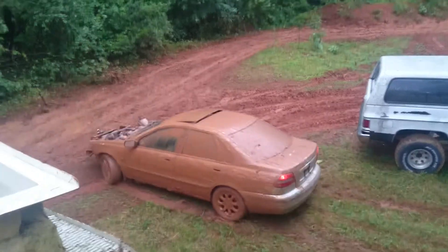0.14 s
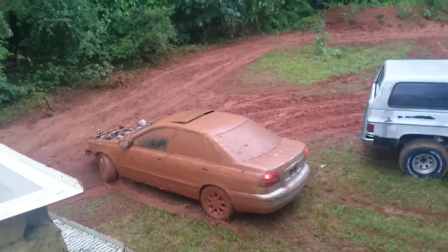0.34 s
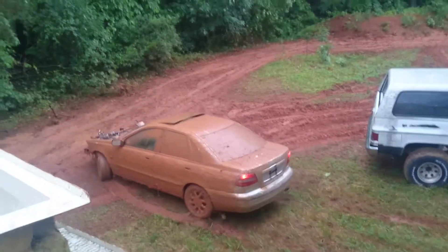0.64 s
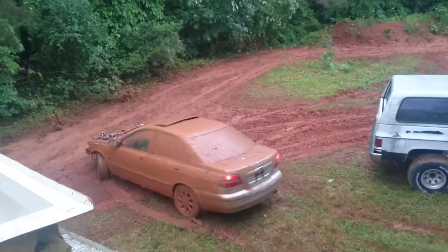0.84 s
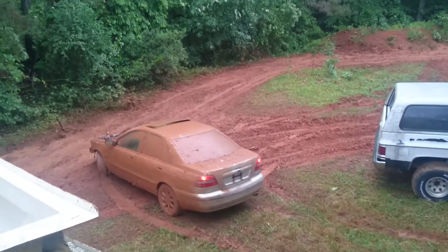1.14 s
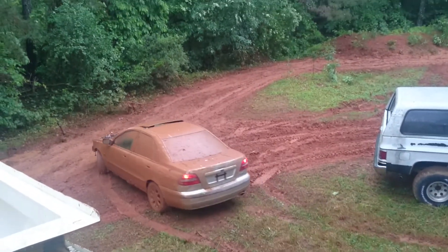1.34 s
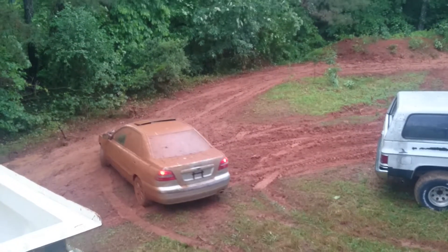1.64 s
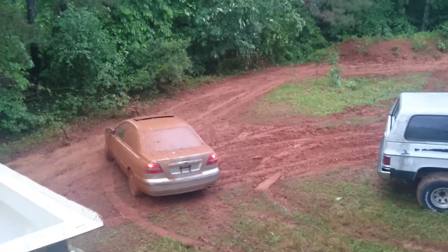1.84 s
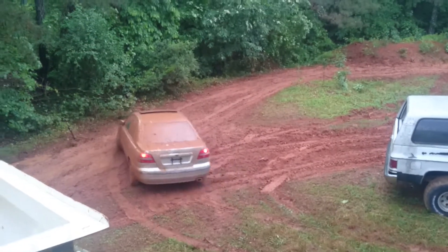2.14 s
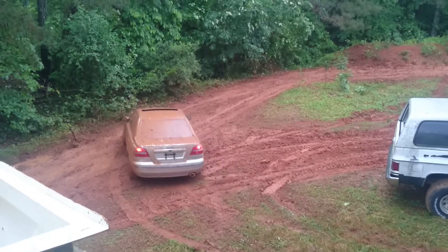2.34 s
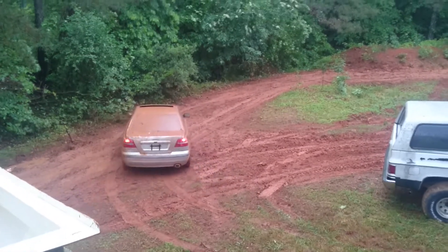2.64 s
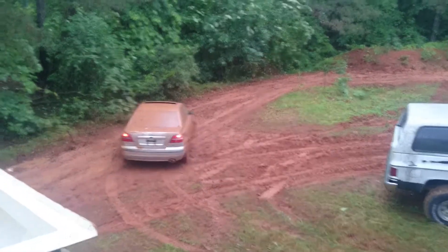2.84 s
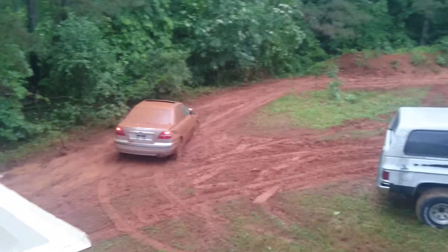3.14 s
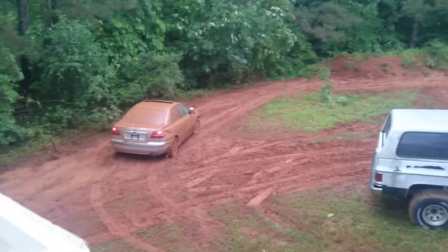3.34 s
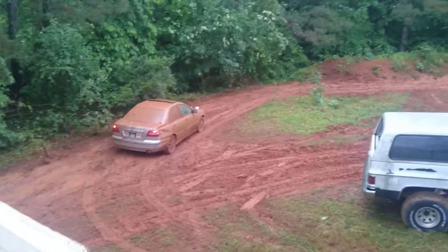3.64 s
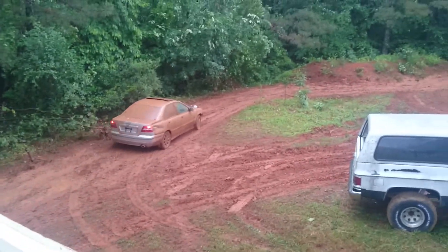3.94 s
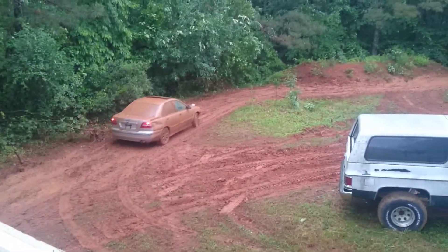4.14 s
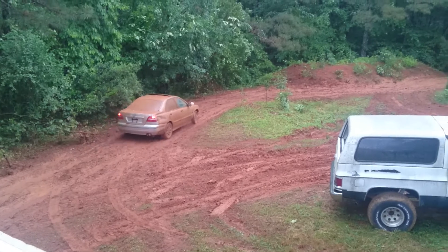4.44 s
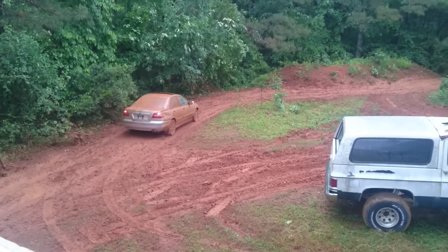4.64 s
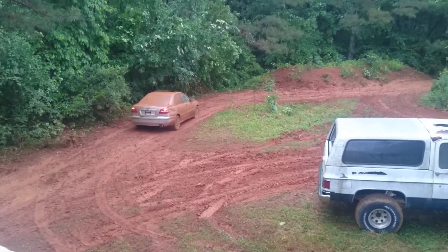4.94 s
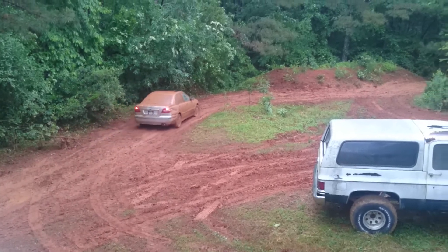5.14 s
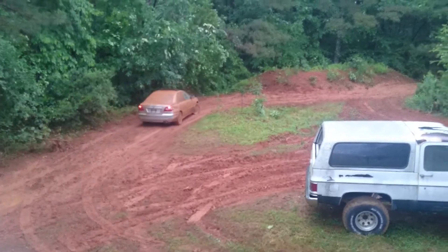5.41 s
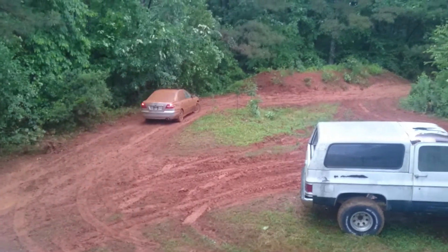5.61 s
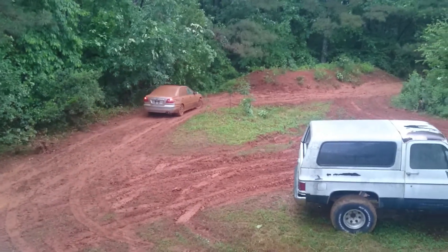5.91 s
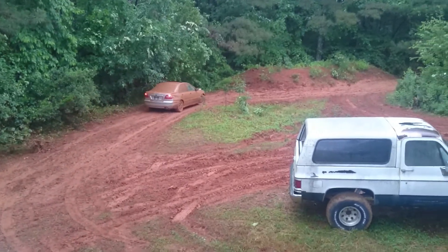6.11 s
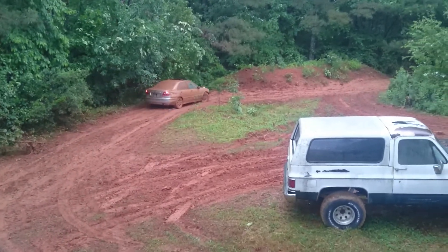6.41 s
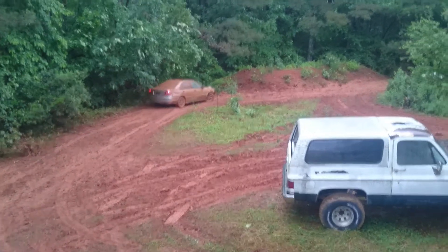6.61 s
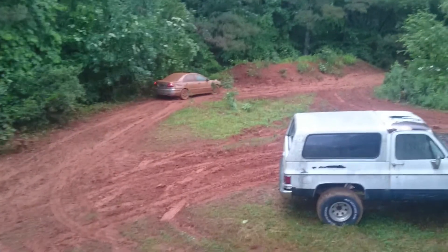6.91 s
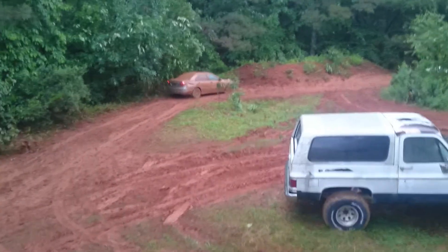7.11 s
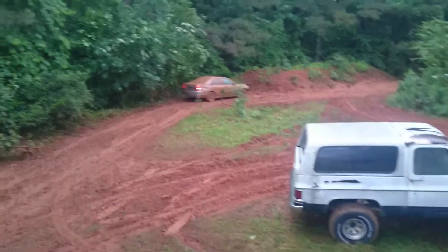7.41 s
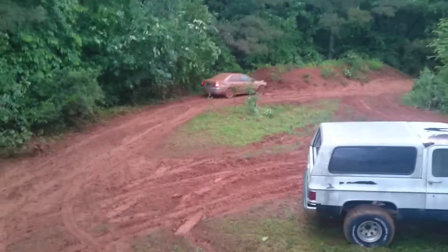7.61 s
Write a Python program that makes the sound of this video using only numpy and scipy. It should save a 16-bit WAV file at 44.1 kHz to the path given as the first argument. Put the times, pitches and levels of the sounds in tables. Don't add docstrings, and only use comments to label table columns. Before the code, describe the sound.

Spinning tyres sling wet mud in a loud rushing hiss over a low steady engine drone as a car pulls away and fades.

```python
import sys
import numpy as np
from scipy import signal
from scipy.fft import rfft, irfft, next_fast_len
from scipy.io import wavfile
from scipy.ndimage import uniform_filter1d, map_coordinates

SR = 44100
rng = np.random.default_rng(int(sys.argv[2]) if len(sys.argv) > 2 else 0)


def invert_db(level):
    return 10 ** (np.asarray(level, dtype=float) / 20)


def unload_wav(signal):
    wavfile.write(
        sys.argv[1],
        SR,
        np.round(np.clip(np.atleast_2d(signal).T, -1, 1) * 32767).astype(np.int16),
    )


N = 342417
TIME = np.arange(N) / SR
SIZE = next_fast_len(N + 8192)
HZ = np.fft.rfftfreq(SIZE, 1 / SR)

# (frequency [Hz], lead [radians])
LEAD_FROM_BEHIND = [(1290, 3.51), (2930, 4.33), (3960, 4.34), (4220, 3.46), (4910, 4.7), (6120, 5.53),
                    (6890, 9.5), (8610, 12), (10200, 10.8), (11700, 11.06), (14000, 13.5), (15500, 18),
                    (16500, 15)]


def unit(x):
    return x / np.sqrt(np.mean(x ** 2) + 1e-20)


def curves(rows):
    times, *columns = np.transpose(rows)
    return np.array([np.interp(TIME, times, column) for column in columns])


def along(rows):
    freqs, *columns = np.transpose(rows)
    return np.array([np.interp(np.log(HZ + 1), np.log(freqs + 1), column) for column in columns])


def wobble(rate):
    coarse = TIME[::128]
    knots = rng.standard_normal(int(N * rate / SR) + 4)
    return np.interp(TIME, coarse, map_coordinates(knots, [coarse * rate]))


def plateau(start, end, db_per_s):
    return -db_per_s * np.maximum(np.maximum(start - TIME, TIME - end), 0)


def ports(lead):
    # (frequency [Hz], lead [radians])
    bass_lead = [(60, 2.98), (150, 2.99), (260, 3.08), (500, 3.13), (780, 3.3)]
    freqs, radians = np.transpose(bass_lead + lead)
    left = -np.exp(1j * np.interp(HZ, freqs, radians))
    right = -np.ones(len(HZ))
    return np.array([left, right])


def engine():
    # (time [s], firing rate [Hz], load level [dB], throttle level [dB])
    driving = [(0, 64.5, -34, -2), (.3, 74, -30, 0), (.6, 81.8, -29, 10), (.86, 86.8, -37, 13),
               (1.11, 84.6, -41, 5), (1.27, 71.4, -33.5, -1), (1.6, 71.8, -37.5, -1),
               (1.95, 76.4, -39.5, -3), (2.75, 65.5, -39, -7), (3.65, 71.8, -35, 3), (4.25, 75, -36, 2),
               (4.55, 80, -40, 4), (5.03, 88.6, -33, 5), (5.47, 86.6, -32.5, 4), (6.05, 72, -44, -6),
               (6.6, 64.8, -43, -4), (7.0, 66.5, -48, -2), (7.2, 56, -57, -14)]
    # (frequency [Hz], level [dB])
    pipe = [(115, -5), (134, -2), (146, 0), (158, 0), (165, -3), (171, -8), (177, -10)]
    # (multiple of the firing rate [-], level at middle revs [dB])
    weak_orders = [(.5, -72), (1.5, -67), (3, -61), (4.5, -67), (5, -70), (6, -65), (7.5, -70), (9, -56),
                   (10.5, -70)]
    second_start_db, leaving_db_per_s = -38, 1.6

    rate, first_db, effort_db = curves(driving)
    rate = uniform_filter1d(rate, SR // 8)
    second_db = second_start_db - leaving_db_per_s * TIME + np.interp(2 * rate, *np.transpose(pipe))
    phase = 2 * np.pi * np.cumsum(rate * (1 + 0.002 * wobble(20))) / SR
    first = invert_db(first_db + 0.8 * wobble(5) + wobble(11)) * np.cos(phase)
    second = invert_db(second_db + wobble(5) + wobble(11)) * np.cos(2 * phase - 0.6)
    weak = np.zeros(N)
    for multiple, db in weak_orders:
        weak += invert_db(effort_db + db + 2.8 * wobble(9)) * np.cos(multiple * phase + 0.9 * wobble(14))
    running = np.clip((7.3 - TIME) / 0.13, 0, 1)
    return np.sqrt(2) * (first + second + weak) * running


def fan():
    blade_hz = 258.6
    # (time [s], level [dB])
    fan_level = [(0, -41.5), (1.0, -41), (1.5, -51), (2.85, -54), (3.1, -62), (7.76, -63)]
    phase = 2 * np.pi * blade_hz * TIME + 0.25 * wobble(18)
    hum = np.sin(phase) + invert_db(-18) * np.sin(2 * phase)
    return np.sqrt(2) * invert_db(curves(fan_level)[0] + 1.5 * wobble(8)) * hum


def droplets(patchy_db, per_s, grain_db, spread_db):
    spectrum = signal.stft(rng.standard_normal((3, N)), nperseg=512)[2]
    patches = uniform_filter1d(rng.standard_normal(spectrum.shape[1:]), 6, 0)
    patches = uniform_filter1d(patches, 9, 1)
    noise = signal.istft(spectrum * invert_db(patchy_db * unit(patches)), nperseg=512)[1][:, :N]
    chance = rng.random((3, N))
    rarity = np.minimum(np.log(per_s / SR / chance), 3.5)
    drops = (chance < per_s / SR) * invert_db(grain_db + spread_db * rarity) * np.sign(noise)
    return noise + np.diff(drops, prepend=0)


def arriving(lead, echo_s, echo_db, direct_db):
    # (frequency [Hz], share [0-1])
    common_share = [(100, 0.96), (350, 0.99), (520, 0.92), (750, 0.99), (1200, 0.71), (2200, 0.51),
                    (3200, 0.44), (6000, 0.51), (7200, 0.24), (9000, 0.56), (15000, 0.57)]
    balance = invert_db(np.outer([0.5, -0.5, -0.5], direct_db))
    balance /= np.sqrt(np.mean(balance[:2] ** 2, axis=0))
    streams = balance * droplets(patchy_db=1.14, per_s=380, grain_db=-2.0, spread_db=6.5)
    common, *own = rfft(streams, SIZE)
    share = np.clip(along(common_share), 0, 1)
    echo = invert_db(echo_db) * np.exp(-2j * np.pi * HZ * echo_s) / (1 + (HZ / 9000) ** 2)
    direct = common * (1 + echo) / (1 - 0.01 * echo) * ports(lead)
    return np.sqrt(share) * direct + np.sqrt(1 - share) * np.array(own)


def clods():
    # (time [s], length [s], extra slush [dB], extra hiss [dB], extra mist [dB])
    splats = [(1.58, 0.082, -2, 0, 3.5), (1.663, 0.072, -5, -3, -7), (1.832, 0.026, 2, 1, 5),
              (2.069, 0.061, 9.5, 1.5, -5), (3.038, .02, 0, 1, 0), (3.238, 0.01, 5, 5, 2),
              (3.333, 0.0036, 13, 12, -4), (3.49, 0.039, 0.5, 6, 4), (3.536, 0.024, 0, 4, 5),
              (3.569, 0.024, -1, 4.5, 7), (3.616, 0.007, 5, -10, 9), (3.637, 0.037, 6, 5.5, 5),
              (3.685, 0.03, 9, 0, 4), (3.707, 0.018, 5, 7, 7), (3.742, 0.011, 10, 5, 22),
              (4.1, 0.015, -1, 4, -11), (5.23, 0.059, 0, 5.5, -3), (5.365, 0.048, 2, -0.5, 1),
              (5.639, 0.055, 5, 2, 3), (6.279, 0.093, 3.5, -0.5, 5), (6.48, 0.073, 8.5, 0.5, -4),
              (6.97, .01, -5, 4, 4), (2.676, 0.0043, 6, 8, 9), (3.288, .003, -8, -3, -1),
              (3.293, 0.0044, -16, -1, -4), (3.486, .006, 0, 5, 2), (4.466, 0.0054, -6, 9, 0),
              (4.527, .005, -2, 4, -4), (5.719, .005, 3, 10, 2), (5.833, .005, -9, 10, 2),
              (5.95, .005, -7, -6, 6), (2.85, 0.27, 0, -1.5, 2), (4.17, 0.17, 1.5, 0.5, -8),
              (4.62, .2, 0, -0.5, -2), (6.548, .22, 4, 0.5, -4), (7.12, 0.17, 1.5, 1, 1),
              (0.155, 0.24, 0.5, 1.5, -1), (0.46, 0.22, -1, 0, -1.5), (3.39, 0.092, 2.5, -1.5, 2),
              (1.442, 0.11, -4.5, -2, -1.5), (7.22, 0.17, 2.5, 1, -4)]
    extra = np.zeros((3, N))
    for s, length, *boost_db in splats:
        start = int(s * SR)
        u = np.arange(min(int(3 * length * SR), N - start)) / SR / length
        extra[:, start:start + len(u)] += np.outer(boost_db, np.minimum(8 * u, 1) * np.exp(-u ** 2))
    return extra


def mud_levels():
    # (time [s], wheelspin [dB], depth of the mud [dB], drag under the floor [dB])
    wheels = [(0, -37.5, -5.5, 2.5), (.25, -31, -6.5, 0), (.7, -28.5, -5.5, 0), (1.0, -30, -0.5, 0.5),
              (1.3, -29.5, -4, -5), (2.0, -32, -3.5, -4), (2.2, -41, -0.5, 8.5), (2.9, -35.5, -4, 2),
              (3.2, -27.5, -7, -2.5), (3.8, -29.5, -0.5, -0.5), (4.1, -31, -6, -2), (4.75, -32, -7, -3),
              (5.25, -27.5, -6.5, -7), (5.7, -30.5, -3, -2), (6.66, -40, -4, 5.5), (7.06, -35.5, 1, 4),
              (7.42, -47, 8, 15.5), (7.76, -50.5, 2.5, 10.5)]
    # (middle [s], half length [s], level [dB])
    arch = (2.09, 0.98, 4.1)
    full_spin_db = -30
    mist_base_db, mist_grows, mist_damped = -41, 1.3, 0.21
    sight_follows = 0.44
    slop_base_db, slop_feels_clods = -11.5, 0.23
    churn_base_db, churn_follows, churn_deep, churn_fade_db_per_s = -40.5, 1, 0.64, 1.25
    woods_db = -60

    surge = 0.3 * wobble(3.8) + 0.5 * wobble(20)
    thrown_db = clods()
    spin_db, depth_db, drag_db = curves(wheels)
    harder = spin_db - full_spin_db
    arch_db = arch[2] * np.exp(-((TIME - arch[0]) / arch[1]) ** 4)
    mist_db = mist_base_db + mist_grows * harder - mist_damped * depth_db + arch_db
    slop_db = slop_base_db + spin_db + drag_db + slop_feels_clods * thrown_db[0]
    direct_db = sight_follows * harder + 0.33 * thrown_db.max(axis=0)

    bands_db = np.array([slop_db, spin_db + depth_db, spin_db, mist_db])
    bands_db += 0.75 * np.pad(thrown_db, ((1, 0), (0, 0))) - 2.5
    bands_db += surge + 0.31 * np.array([wobble(9.2) for band in range(4)])
    churn_db = churn_base_db + churn_follows * harder + churn_deep * drag_db
    churn_db = churn_db - churn_fade_db_per_s * TIME + 1.3 * wobble(7)
    return invert_db(bands_db), invert_db(churn_db) + invert_db(woods_db), direct_db


def mud():
    # (frequency [Hz], ..)
    edges_hz = (560, 1000, 3000, 9000, 15850)
    # (start [s], end [s])
    turn_s = (1.94, 2.9)
    # (frequency [Hz], level per Hz [dB])
    churn_colour = [(20, -14), (45, -7), (70, -1), (120, -.5), (200, -0.5), (350, 2.5), (430, -3.5),
                    (600, -12.5), (900, -48)]
    # (frequency [Hz], left level [dB], right level [dB])
    flank_colour = [(490, -2, 4), (790, -1.2, 3), (1300, 5, 11), (2060, 9, 12.5), (2580, 2, 1.9),
                    (4200, -3, 2), (5500, -10, 10), (5470, 4.5, 10), (6250, 6.5, 6.5), (7240, 7.5, -3.5),
                    (8800, -5, -1.5), (10830, -3, -8), (14070, -10.5, -11), (15500, -4, -3)]
    # (frequency [Hz], left level [dB], right level [dB])
    behind_colour = [(503, 0.5, 4.5), (790, 3, 7.5), (1460, 9, 12.5), (2230, 8.5, 12.5), (2840, 0, -0.1),
                     (4990, -3, 2.5), (5410, -4.5, 7.5), (5970, 7, 7), (6410, 6.5, 5.5), (7170, -0.5, -3),
                     (8750, -8, -7.5), (10050, -7, -12), (13100, -16.5, -15.5), (15700, -9, -18)]
    # (frequency [Hz], lead [radians])
    flank_lead = [(1290, 3.61), (2930, 6.26), (3450, 2.8), (4050, 7.7), (5770, 8.3), (7060, 10.4),
                  (7750, 11.6), (8700, 16), (9820, 16.76), (10900, 16.5), (12400, 21.4), (13900, 25),
                  (16500, 27.5)]

    levels, churn, direct_db = mud_levels()
    behind = np.clip((TIME - turn_s[0]) / (turn_s[1] - turn_s[0]), 0, 1)
    above = [1 / (1 + (edge / (HZ + 1)) ** 16) for edge in edges_hz[:-1]] + [0]
    flank_wave = arriving(flank_lead, echo_s=0.00113, echo_db=-6, direct_db=direct_db)
    behind_wave = arriving(LEAD_FROM_BEHIND, echo_s=0.0014, echo_db=-3.5, direct_db=direct_db)
    views = [(1 - behind, flank_colour, flank_wave), (behind, behind_colour, behind_wave)]
    out = np.zeros((2, N))
    for weight, colour, wave in views:
        spray = wave * invert_db(along(colour)) * (HZ < edges_hz[-1])
        mix = churn * unit(irfft(wave * invert_db(along(churn_colour)), SIZE)[:, :N])
        for k in range(len(levels)):
            band = irfft(spray * np.sqrt(np.abs(above[k] - above[k + 1])), SIZE)[:, :N]
            mix += levels[k] * unit(band)
        out += np.sqrt(weight) * mix
    return out


def singing_rubber(rows, width_hz):
    flutter = 0.6 + 0.7 * (wobble(width_hz) + 1j * wobble(width_hz))
    out = np.zeros(N)
    for s, half, from_hz, to_hz, db in rows:
        u = np.linspace(-2, 2, int(4 * half * SR))
        phase = 2 * np.pi * np.cumsum(from_hz + (to_hz - from_hz) * (u + 1) / 2) / SR
        start = int((s - 2 * half) * SR)
        at = slice(start, start + len(u))
        out[at] += invert_db(db) * np.exp(-u ** 2) * (flutter[at] * np.exp(1j * phase)).real
    return out


def long_singing():
    # (middle [s], half length [s], start pitch [Hz], end pitch [Hz], level [dB])
    thin_notes = [(.25, .12, 2050, 2060, -43), (.45, .1, 2036, 2020, -44), (.68, .12, 2040, 2020, -41.5),
                  (.95, .12, 1960, 1925, -37.5), (1.0, .15, 2050, 2030, -42), (1.2, .1, 1990, 1935, -39),
                  (1.38, 0.078, 1900, 1804, -43), (1.23, .1, 1490, 1470, -40.5),
                  (3.35, .15, 2180, 2220, -45), (3.3, .15, 6500, 6520, -39), (3.5, .12, 6540, 6500, -37),
                  (6.2, .12, 1460, 1470, -49), (6.45, .15, 1480, 1480, -51.5), (6.75, .12, 1460, 1450, -51),
                  (7.07, .1, 1490, 1480, -40.5), (7.1, .08, 2220, 2200, -48), (7.05, .08, 1850, 1890, -45)]
    return np.array([singing_rubber(thin_notes, width_hz=45) for port in range(2)])


def knocks(rows, turns):
    out = np.zeros(N)
    for s, hz, db in rows:
        u = np.arange(SR // 20) / SR * hz
        swing = np.sin(2 * np.pi * u * (1 - 0.03 * np.minimum(u, 2)))
        start = int(s * SR)
        out[start:start + len(u)] += invert_db(db) * swing * np.exp(-(u / turns) ** 2)
    return out


def rut_thuds():
    # (time [s], pitch [Hz], level [dB])
    thuds = [
        (.394, 150, -16),
        (4.33, 120, -22),
        (6.0, 179, -28),
    ]
    return knocks(thuds, turns=0.58)


def squeals():
    # (middle [s], half length [s], start pitch [Hz], end pitch [Hz], level [dB])
    chirps = [(0.793, .035, 2620, 2650, -40), (1.752, .01, 2110, 2100, -35), (1.752, .012, 2480, 2420, -40),
              (1.803, .012, 2450, 2480, -38), (1.836, .008, 2120, 2070, -30),
              (1.841, 0.0077, 2520, 2550, -28), (1.87, .006, 2400, 2330, -38),
              (1.868, .006, 1820, 1800, -41), (2.084, 0.015, 1875, 1830, -31.5),
              (2.112, 0.0087, 1625, 1640, -34), (2.1, .012, 2480, 2450, -36.5),
              (3.244, .001, 6200, 6300, -20), (3.2457, 0.00076, 6270, 6300, -16),
              (3.716, .001, 6340, 6400, -21.5), (3.528, .006, 2360, 2290, -31),
              (3.548, .005, 2220, 2200, -29), (3.568, .007, 2340, 2260, -27),
              (3.621, .005, 2244, 2230, -23), (3.645, .006, 2230, 2200, -30), (3.66, 0.0278, 792, 790, -33),
              (3.69, 0.029, 724, 686, -32), (3.72, .02, 630, 610, -38), (3.674, .012, 2280, 2166, -24),
              (3.674, .01, 1473, 1460, -32), (3.693, .008, 2162, 2070, -24),
              (3.694, 0.011, 1517, 1420, -30), (3.704, 0.0069, 4200, 4050, -31),
              (3.71, 0.0078, 3550, 3540, -33), (3.785, .008, 1810, 1880, -28.5),
              (3.805, .004, 2120, 2080, -35), (7.17, .04, 2150, 2230, -46)]
    return singing_rubber(chirps, width_hz=110)


def tread():
    # (multiple of the block rate [-], loudest moment [s], level [dB])
    overtones = [(2, 7.02, -6), (3, 6.95, -2), (4, 6.99, 2), (5, 6.88, -1), (6, 6.95, -2), (7, 6.9, -11)]
    slip_s, grip_s, stop_s = 6.76, 7.05, 7.39
    block_hz, slip_hz_per_s, brake_hz_per_s = 360, 52, 510
    whine_base_db, hum_base_db, swell_db_per_s = -48, -48.5, 250

    slipping = slip_hz_per_s * (np.minimum(TIME, grip_s) - slip_s)
    braking = brake_hz_per_s * np.maximum(TIME - grip_s + 0.0347, 0)
    phase = 2 * np.pi * np.cumsum(block_hz + slipping - braking) / SR
    hum_db = hum_base_db + plateau(grip_s + 0.039, stop_s - 0.04, swell_db_per_s)
    whine_db = whine_base_db + plateau(slip_s + 0.034, grip_s, swell_db_per_s)
    whine = np.zeros(N)
    for multiple, s, db in overtones:
        level_db = whine_db + db - 350 * (TIME - s) ** 2 + 2.2 * wobble(25)
        whine += invert_db(level_db) * np.sin(multiple * phase + 0.7 * wobble(30))
    return np.sqrt(2) * (invert_db(hum_db + 2.3 * wobble(33)) * np.sin(phase) + whine)


def handling():
    # (time [s], pitch [Hz], level [dB])
    bumps = [
        (6.97, 60, -55),
        (7.095, 68.7, -53),
        (7.15, 60, -65),
        (7.33, 90.5, -53),
        (7.505, 79.6, -48),
        (7.525, 72, -49),
    ]
    # (time [s], pitch [Hz], level [dB])
    taps = [(6.98, 327, -38), (7.037, 197, -47), (7.058, 300, -47), (7.077, 300, -39), (7.093, 200, -50),
            (7.107, 350, -40), (7.123, 200, -48), (7.155, 280, -48), (7.5, 300, -39), (7.517, 350, -40),
            (7.532, 330, -47), (7.546, 300, -48), (7.6, 330, -47), (7.619, 353, -42)]
    return (knocks(taps, turns=0.6) + knocks(bumps, turns=1.7)) * np.array([[1.1], [0.8]])


def scene():
    # (frequency [Hz], left level [dB], right level [dB])
    tone_ports = [(25, -22, -22), (56, 0.3, -0.1), (150, -1.1, 0.2), (259, -0.2, 0.2), (500, -2.5, 2),
                  (780, -1.8, 1.4), (1490, -2.5, 5.0)]
    car = rfft(engine() + fan() + rut_thuds() + squeals() + tread(), SIZE)
    tones = irfft(car * ports(LEAD_FROM_BEHIND) * invert_db(along(tone_ports)), SIZE)[:, :N]
    return tones + mud() + long_singing() + handling()


def band_limit(x):
    return signal.sosfilt(signal.butter(12, 15900, fs=SR, output="sos"), x)


def record(dry):
    mix = dry - 0.001
    return band_limit(mix)


dry = scene()
out = record(dry)
unload_wav(out)
```